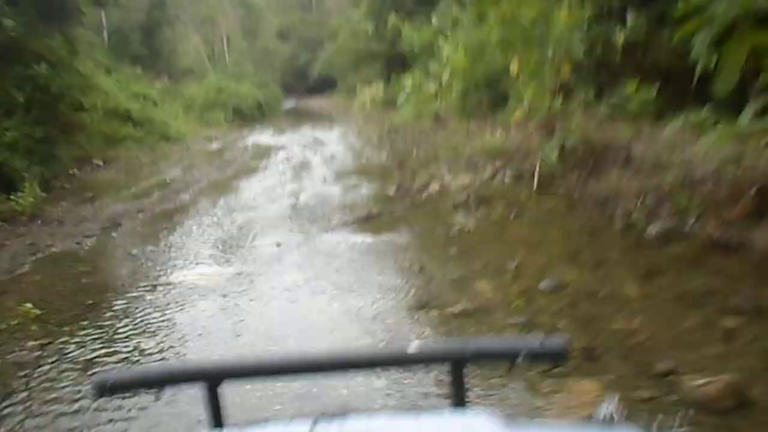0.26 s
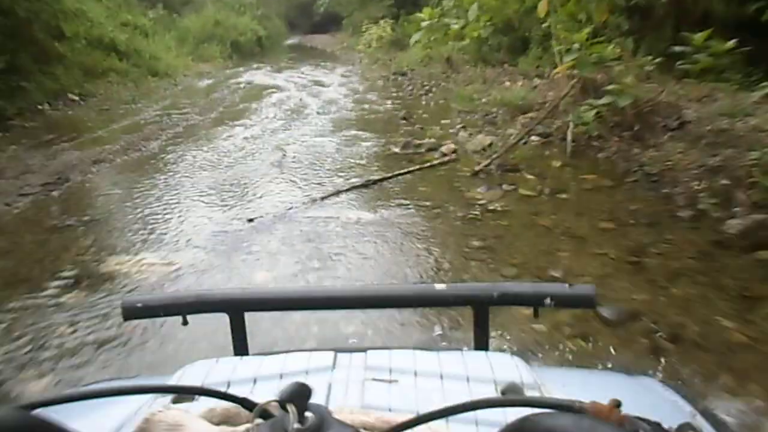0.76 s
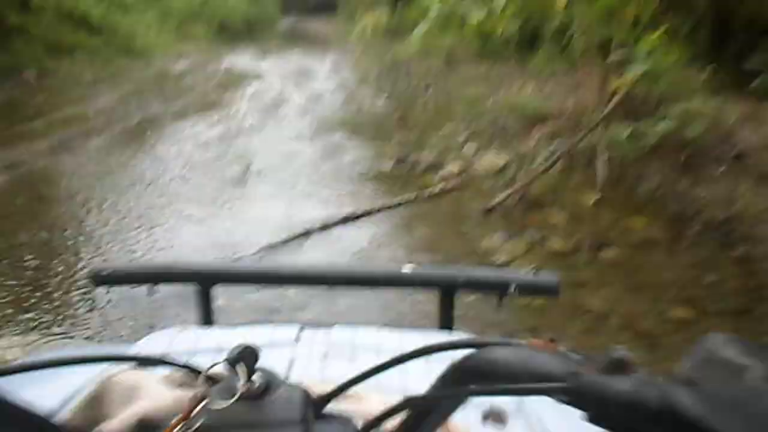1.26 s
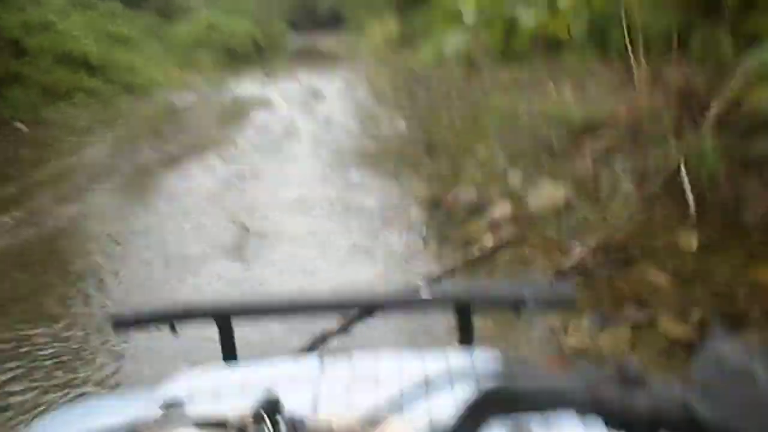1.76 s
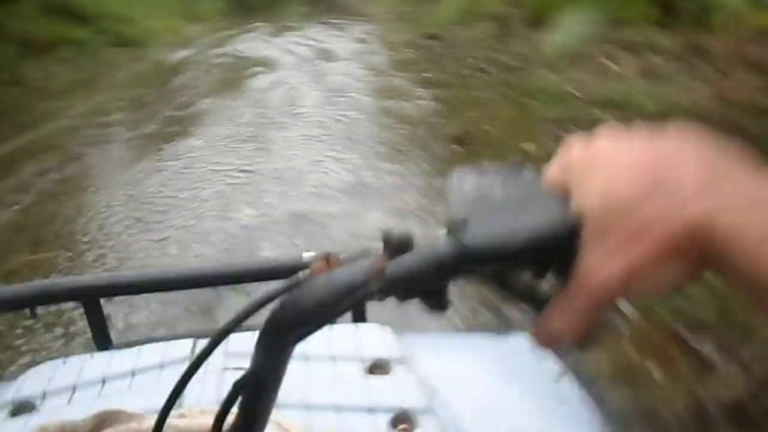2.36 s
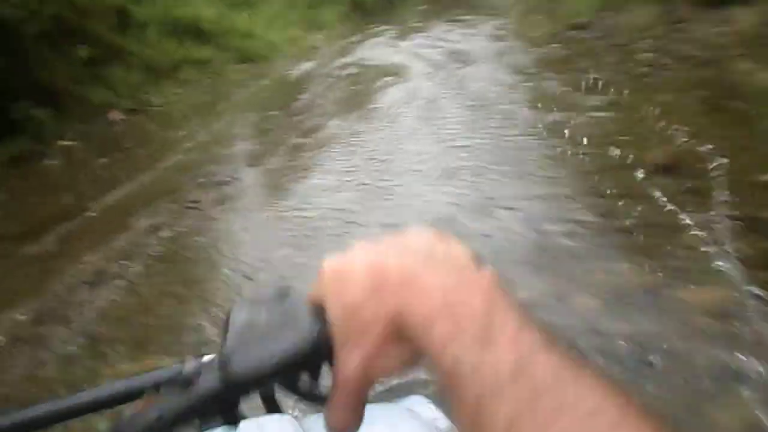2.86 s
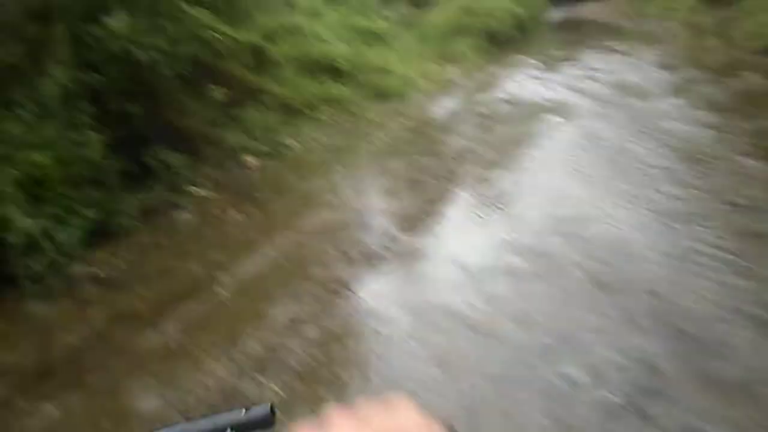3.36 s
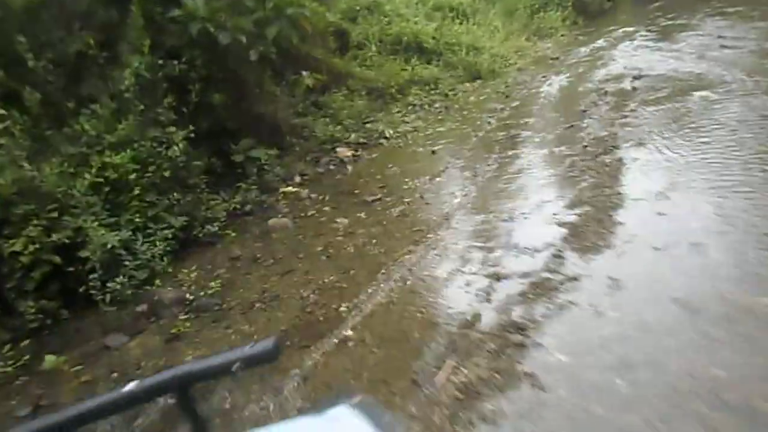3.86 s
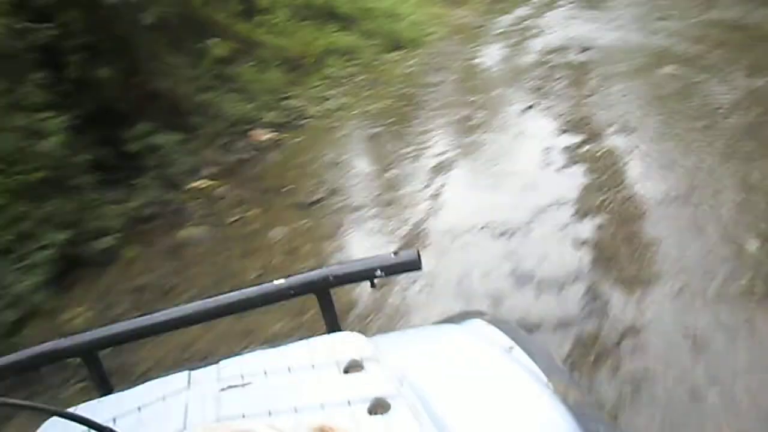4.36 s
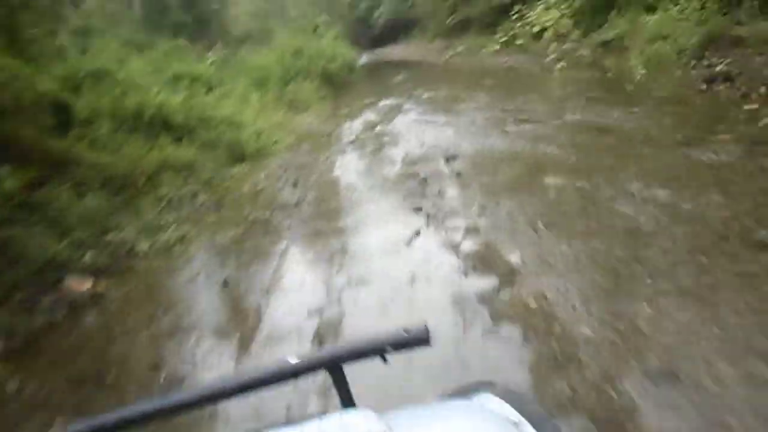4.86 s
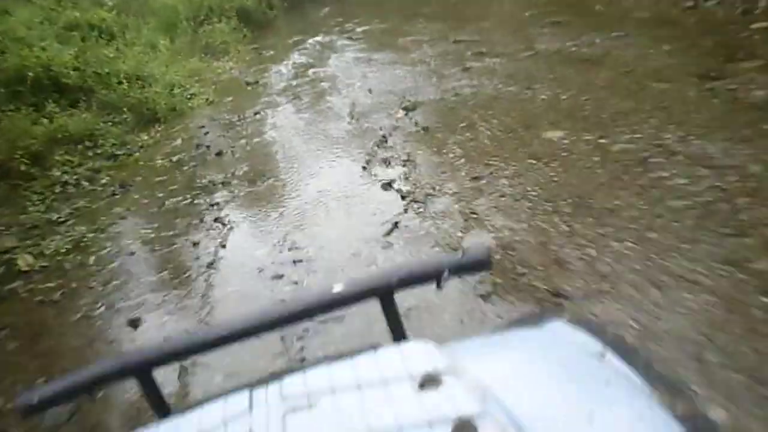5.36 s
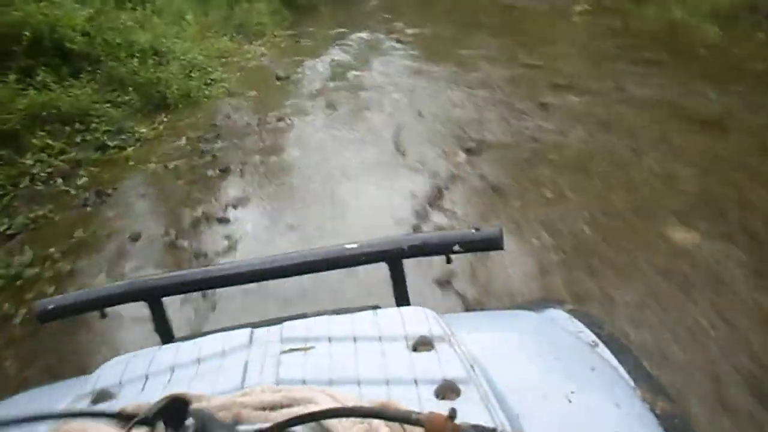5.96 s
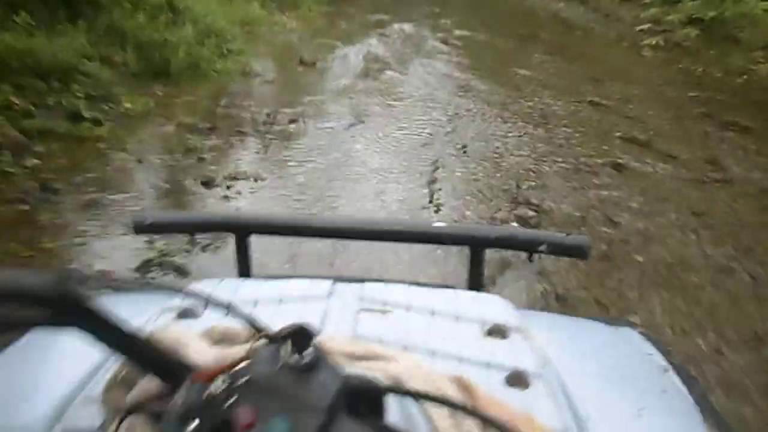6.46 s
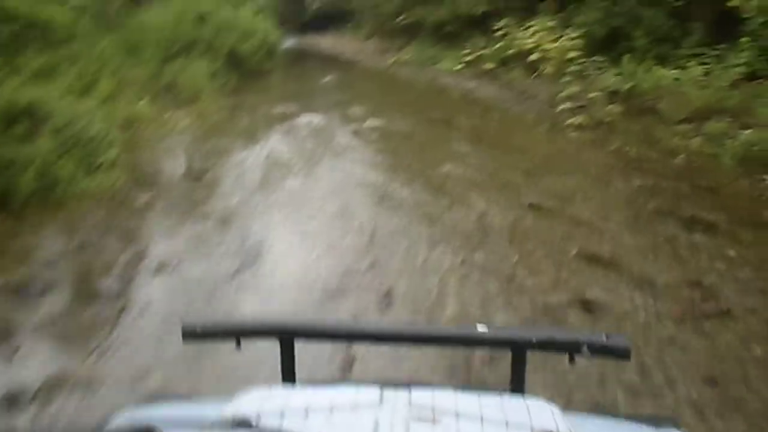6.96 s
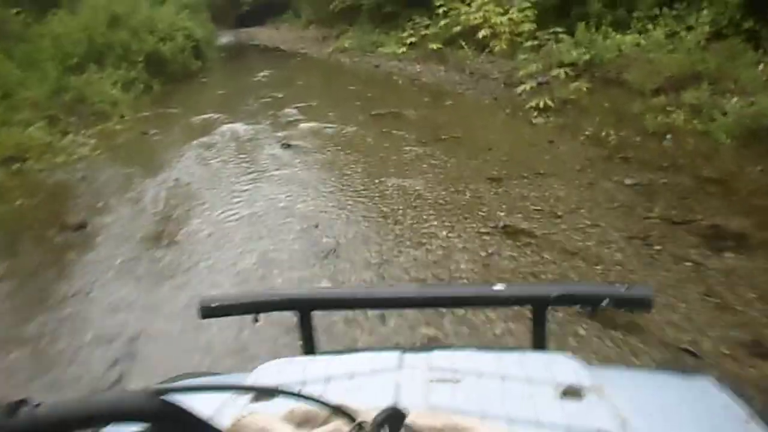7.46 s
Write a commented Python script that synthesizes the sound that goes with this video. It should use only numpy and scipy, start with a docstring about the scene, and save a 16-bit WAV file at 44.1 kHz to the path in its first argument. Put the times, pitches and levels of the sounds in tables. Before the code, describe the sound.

From the rider's seat, a small four-stroke quad engine thumps unevenly up a shallow stream, with valve clatter, tyre wash and gear clanks.

```python
"""A shallow stony stream bed: a single-cylinder four-stroke quad bike climbs slowly, heard from the rider's seat.
Each firing rings the exhaust resonances as crack, thump, bark and rasp; shaped noise makes the gas puff,
the valve clatter and the intake hiss once a cycle, and the throttle opens and closes.
Noise bursts and ringing steel make the gear change, flickering noise the tyre wash, faint wavering tones a wet brake.
Air and one bump push on the microphone of a camera close by, whose case colours the treble."""
import sys
import numpy as np
from scipy import signal
from scipy.fft import rfft, irfft, next_fast_len
from scipy.io import wavfile
from scipy.ndimage import uniform_filter1d

SR = 44100
rng = np.random.default_rng(int(sys.argv[2]) if len(sys.argv) > 2 else 0)


def wav_record(signal):
    """Record a signal, one row per channel, as 16-bit PCM in the file named by sys.argv[1]."""
    frames = np.transpose(np.atleast_2d(signal))
    bounded = np.clip(frames, -1, 1)
    # unit amplitude maps onto the largest positive 16-bit level
    quanta = np.round(bounded * 32767).astype(np.int16)
    wavfile.write(sys.argv[1], SR, quanta)


N = 340011
TIME = np.arange(N) / SR
SIZE = next_fast_len(N + SR // 2, True)  # padded length for filtering
FREQ = np.maximum(np.fft.rfftfreq(SIZE, 1 / SR), 1)
CRUISE_HZ = 23  # firings per second at which the engine levels are stated


def undb(db):
    """Decibels to gain."""
    return 10 ** (np.asarray(db) / 20)


def unit(x):
    """Scale to rms 1."""
    return x / np.sqrt(np.mean(x ** 2))


def curves(table):
    """The columns of a table of (t/s, ..) rows, drawn as straight lines at every sample."""
    s, *columns = np.transpose(table)
    return [np.interp(TIME, s, column) for column in columns]


def through(x, response):
    """Filter by a frequency response."""
    return irfft(rfft(x, SIZE) * response, SIZE)[:N]


def colour(x, points):
    """Shape a sound by (f/Hz, level/dB) points; rms 1."""
    hz, db = np.transpose(points)
    level_db = np.interp(np.log(FREQ), np.log(hz), db)
    return unit(through(x, undb(level_db)))


def noise(points):
    """Coloured noise of rms 1."""
    return colour(rng.standard_normal(N), points)


def ring(at, size, stretch, modes, rise_ms):
    """Each blow swells into the modes and dies away, at its own size and pitch; rms 1."""
    hz, width, db, side = np.transpose(modes)[:, :, None]
    age = TIME[:SR // 8]
    swell = 1 - np.exp(-age * 1000 / rise_ms)
    envelopes = np.sign(side) * undb(db) * np.exp(-np.pi * width * age)
    out = np.zeros(N + len(age))
    for start, gain, k in zip(at, size, stretch):
        waves = envelopes * np.sin(2 * np.pi * hz * k * age)
        out[start:start + len(age)] += gain * swell * waves.sum(0)
    return unit(out[:N])


def cut(x, hz, kind, order=2):
    """Low-pass or high-pass."""
    return signal.sosfilt(signal.butter(order, hz, kind, fs=SR, output="sos"), x)


def later(x, ms):
    """Delay a sound."""
    return np.interp(TIME - ms / 1000, TIME, x, left=0)


def walk(rate):
    """A random wander of spread near 1, with `rate` new values a second joined by straight lines."""
    knots = rng.standard_normal(4096)
    return np.interp(TIME * rate, np.arange(len(knots)), knots)


def engine_gain(law, firing_hz, throttle):
    """A part of the engine grows louder with the throttle and changes with speed."""
    full_db, shut_db, octave_db = law
    return undb(full_db - shut_db * (1 - throttle) + octave_db * np.log2(firing_hz / CRUISE_HZ))


def firings(cycles, slack, scatter_db, jitter_ms):
    """Sample and size of each firing; on a closed throttle the burn is uneven in strength and timing."""
    at = np.searchsorted(cycles, np.arange(1, int(cycles[-1]) + 1))
    strength, late = rng.standard_normal((len(at), 2)).T
    delay = late * slack[at] * jitter_ms * SR / 1000
    size = undb(scatter_db * strength * (0.5 + 1.7 * slack[at]))
    return np.clip(at + delay.astype(int), 0, N - 1), size


# exhaust resonances, silencer box up to pipe overtones, and the sharp first crack:
# f/Hz, width/Hz, relative level/dB, polarity
BOOM_MODES = [(47.5, 29, 0, 1)]
THUMP_MODES = [(119.6, 54.4, 0, -1)]
CRACK_MODES = [(383.7, 144, 0, -1)]
BARK_MODES = [(285.9, 15.8, 0, -1), (315.4, 24.6, 9, -1), (410, 17.6, -13, 1), (433, 28, -3.5, -1)]
RASP_MODES = [(523, 47.5, 6, -1), (639.4, 30, 5, 1), (801, 26, -1, -1), (897.5, 45, -4.5, 1)]
# turbulent gas: f/Hz, relative level/dB
GAS_COLOUR = [(50, -14.5), (85, 2), (130, -0.5), (200, -3), (300, -2), (430, -6.5), (550, -12.5),
              (800, -20), (1300, -24), (2200, -26.5), (5000, -61.5)]
# how each part follows the engine: level/dB at full throttle and cruising speed,
# loss/dB with the throttle shut, slope/dB per octave of speed
BOOM_LAW = (-19.5, 10.5, 4.5)
THUMP_LAW = (-17, 15, -15.5)
CRACK_LAW = (-27, 25, -6.5)
BARK_LAW = (-27, 15, 3.5)
PUFF_LAW = (-37, 1.5, 4)
RASP_LAW = (-51, 0.5, -5.5)
# bark and rasp over their usual strength: t/s, level/dB
BARK_LIFT_CURVE = [(.6, -0.5), (1.2, -2.5), (2.1, -5), (2.4, 1), (3.7, -1), (4.7, 1.5), (5.2, 0.5),
                   (7.7, 3)]
RASP_LIFT_CURVE = [(.62, 4.5), (.8, -7), (2.5, -4), (4.6, -3), (5.9, -1), (6.7, 2.5), (7.7, 6.5)]
STEADY_THROTTLE, SLACK_THUMP_DB = .45, -13.5  # below this opening the burn turns slack and the thump weakens
# the pulse returns from the pipe's end, most clearly on a light throttle
ECHO_MS, ECHO_OPEN_DB, ECHO_SHUT_DB = 8.14, -16.5, 5


def exhaust(cycles, firing_hz, throttle, boom_lag_ms=2.79, thump_lag_ms=0.58, bark_lag_ms=0.82, rasp_lag_ms=2.52):
    """Each firing cracks out of the valve, thumps the silencer and rings the pipe; a puff of gas follows."""
    slack = np.clip(1 - throttle / STEADY_THROTTLE, 0, 1)
    at, size = firings(cycles, slack, scatter_db=1.046, jitter_ms=1.2)
    # hotter, faster gas at high revs lifts the resonances, and no two burns are equally hot
    revs = firing_hz[at] / CRUISE_HZ
    heat = 1 + .004 * rng.standard_normal(len(at))

    boom = later(ring(at, size, heat * revs ** 0.96, BOOM_MODES, rise_ms=2.2), boom_lag_ms)

    # the gas takes some milliseconds to leave the cylinder, which rounds the thump
    thump = later(ring(at, size, heat * revs ** 0.68, THUMP_MODES, rise_ms=6), thump_lag_ms)
    echo_db = ECHO_SHUT_DB + (ECHO_OPEN_DB - ECHO_SHUT_DB) * throttle
    echo = later(thump, ECHO_MS) * undb(echo_db)
    thump = unit(thump + echo) * undb(SLACK_THUMP_DB * slack)

    crack = unit(cut(ring(at, size, heat, CRACK_MODES, rise_ms=1.56), 617, "low"))

    bark = later(ring(at, size, heat * revs ** 0.51, BARK_MODES, rise_ms=0.69), bark_lag_ms)
    bark = unit(cut(bark, 500, "low")) * undb(curves(BARK_LIFT_CURVE)[0])

    rasp = later(ring(at, size, heat * revs ** 0.17, RASP_MODES, rise_ms=3.2), rasp_lag_ms)
    rasp = rasp * undb(curves(RASP_LIFT_CURVE)[0])

    flow = np.exp(-((cycles - .06) % 1) / 0.99)
    flow = uniform_filter1d(flow, size=300)  # the valve opens gradually
    puff = unit(noise(GAS_COLOUR) * flow)

    parts = [(boom, BOOM_LAW), (thump, THUMP_LAW), (crack, CRACK_LAW),
             (bark, BARK_LAW), (puff, PUFF_LAW), (rasp, RASP_LAW)]
    return sum(part * engine_gain(law, firing_hz, throttle) for part, law in parts)


# knocks in each cycle: place in the cycle/0-1, decay/cycles, relative level/dB
VALVE_KNOCKS = [(0.264, 0.03, -6), (0.595, 0.16, 8), (0.94, 0.17, 3.5)]
# valve cover and crankcase: f/Hz, relative level/dB
CLATTER_COLOUR = [(500, -27.5), (1300, -38), (2200, 4), (3500, 6), (6000, -1), (7500, 1), (10000, -11.5)]
# clatter over its usual strength: t/s, level/dB
CLATTER_LIFT_CURVE = [(0, 0), (1, 2.5), (2.5, 0), (3.9, -0.5), (4.8, 0.5), (5.05, -2), (5.7, 2.5), (6.7, 1),
                      (7.7, 1.5)]
# level/dB at full throttle and cruising speed, loss/dB with the throttle shut, slope/dB per octave of speed
CLATTER_LAW = (-49.5, 8, 3.5)


def valve_train(cycles, firing_hz, throttle):
    """Rockers and valves knock at fixed places in the cycle, never twice alike, over the whirr of the cam chain."""
    force = 0.33  # the steady whirr
    for place, decay, db in VALVE_KNOCKS:
        since = cycles + 1 - place
        strength = undb(db + 1.4 * rng.standard_normal(512))[since.astype(int)]
        force = force + strength * np.exp(-(since % 1) / decay)
    rattle = rng.standard_normal(N) * uniform_filter1d(force, size=70) * undb(0.53 * walk(450))
    clatter = colour(rattle, CLATTER_COLOUR) * undb(curves(CLATTER_LIFT_CURVE)[0])
    return clatter * engine_gain(CLATTER_LAW, firing_hz, throttle)


# air intake: f/Hz, relative level/dB
INTAKE_COLOUR = [(1500, -20), (3500, 1), (6000, -7), (7500, -0.5), (9000, -2.5), (10300, -11)]
# level/dB at full throttle and cruising speed, loss/dB with the throttle shut, slope/dB per octave of speed
INTAKE_LAW = (-49.5, 15, 4.5)


def intake(cycles, firing_hz, throttle, place=0.44, length=0.15):
    """Air hisses past the throttle while the piston draws in; place and length are in cycles."""
    draw = 0.2 + np.exp(-((cycles % 1 - place) / length) ** 2)
    hiss = unit(noise(INTAKE_COLOUR) * draw * undb(2.7 * walk(30)))
    return hiss * engine_gain(INTAKE_LAW, firing_hz, throttle)


# tyres in water: f/Hz, relative level/dB
WASH_COLOUR = [(100, -14), (300, -3), (600, 0), (950, -2), (1200, 1), (1600, -5), (2500, -12), (9000, -25)]
# tyres in the stream: t/s, level/dB
WATER_LEVEL = [(0, -48.5), (1, -51), (1.3, -49), (2.1, -50), (4.6, -47), (5.4, -52), (7.7, -51)]


def tyres():
    """Water churns round the tyres, with small spatters in it."""
    spatter = rng.standard_normal(N) * undb(3.7 * walk(300))
    return colour(spatter, WASH_COLOUR) * undb(curves(WATER_LEVEL)[0] + 0.16 * walk(4.2))


# gusts and lurches that push air on the camera, added to the breeze: t/s, half length/s, level/dB
AIR_GUSTS = [(0.156, 0.63, -27.5), (1.397, 0.46, -30), (2.365, 0.17, -16), (3.297, 1, -31)]
BREEZE_DB = -39.5


def buffeting(eddy_db=-8.5):
    """Air and jolts of the track push slowly on the microphone."""
    strength = undb(BREEZE_DB)
    strength = strength + sum(undb(db) * np.exp(-((TIME - s) / half) ** 2) for s, half, db in AIR_GUSTS)
    push = noise([(4, -18), (12, 0), (20, -2), (30, -9), (50, -20), (90, -32), (200, -48), (600, -80)])
    # only the strongest gusts break up into a higher rumble
    eddies = noise([(25, -9.5), (60, 3), (110, -7.5), (200, -23.5), (600, -71.5)]) * undb(eddy_db)
    return push * strength + eddies * strength ** 2


# clanks of the gear change and drive: t/s, relative level/dB, lead of the first touch/ms
GEAR_CLANKS = [(.368, -23.5, 5), (.426, -28, 27), (1.524, -22, 6), (2.227, -21, 5.5), (2.276, -28, 6.3),
               (2.334, -26, 11), (2.368, -29, 4), (2.535, -33.5, 3)]
# gearbox: f/Hz, relative level/dB
GEARBOX_COLOUR = [(150, -22), (500, 8.5), (800, 11.5), (1400, -3), (2300, 0.5), (3700, 1.5), (4500, -1),
                  (5400, -11), (6300, -8), (7200, -7.5), (10000, -30)]
# ringing steel of the gear change: f/Hz, width/Hz, relative level/dB, polarity
STEEL_MODES = [(812, 49, -8, 1), (2150, 120, 8, -1), (2810, 44, 1, 1), (3040, 30, -1.5, -1),
               (3636, 69, 0.5, 1), (6260, 146, 6, -1)]
TOUCH_DB, CHATTER_MS = -4.5, 8.2  # the first touch is lighter than the blow that seats the part; both die away


def gear_change(chatter_db=-8, steel_db=-55.5):
    """Steel parts touch, slap home, ring briefly and chatter to rest in the gearbox."""
    force = np.zeros(N)
    age_ms = TIME[:SR // 8] * 1000
    s, db, lead_ms = np.transpose(GEAR_CLANKS)
    at = (np.r_[s - lead_ms / 1000, s] * SR).astype(int)  # all touches, then all blows
    sizes = undb(np.r_[db + TOUCH_DB, db])
    for start, size in zip(at, sizes):
        force[start:start + len(age_ms)] += size * np.exp(-age_ms / CHATTER_MS)
    chatter = noise(GEARBOX_COLOUR) * force
    pitch = 1 + 0.0033 * rng.standard_normal(len(at))
    steel = ring(at, sizes, pitch, STEEL_MODES, rise_ms=0.24)
    return chatter * undb(chatter_db) + steel * undb(steel_db)


# faint squeals of a wet brake: start t/s, end t/s, f/Hz, peak level/dB
BRAKE_SQUEALS = [(1.7, 1.98, 3080, -50), (1.944, 2.34, 6020, -68)]


def brake():
    """A wet pad sings faintly, swelling and fading, with a wavering pitch."""
    out = np.zeros(N)
    for start, end, hz, db in BRAKE_SQUEALS:
        press = np.sin(np.pi * np.clip((TIME - start) / (end - start), 0, 1))
        phase = 2 * np.pi * np.cumsum(hz * (1 + 0.0042 * walk(60))) / SR
        out += undb(db) * press * np.sin(phase)
    return out


def jolt(s=2.232, db=-27.5):
    """A bump shakes the camera with a dull thud and leaves it swaying for a moment."""
    modes = [(12, 9, 0, -1), (45, 60, -6, -1)]  # f/Hz, width/Hz, relative level/dB, polarity
    return ring([int(s * SR)], [1], [1], modes, rise_ms=2.5) * undb(db)


# engine speed: t/s, firing rate f/Hz
FIRING_RATE = [(0.0, 26.63), (0.6, 25.43), (1.04, 20.57), (1.26, 22.0), (1.66, 20.01), (2.0, 21.09),
               (2.22, 20.4), (2.6, 26.43), (2.82, 21.39), (3.1, 25.66), (3.18, 23.88), (3.48, 27.99),
               (3.6, 25.26), (3.98, 22.64), (4.5, 25.05), (4.72, 27.86), (4.92, 23.59), (5.72, 20.26),
               (6.12, 21.77), (6.32, 20.36), (6.7, 23.04), (7.1, 22.41), (7.44, 24.74), (7.7, 23.48)]
# the rider's thumb: t/s, throttle opening/0-1
THUMB = [(0.0, 0.57), (0.55, 0.64), (0.86, 0.16), (1.06, 0.19), (1.3, 0.59), (1.63, 0.23), (1.74, 0.6),
         (2.09, 0.31), (2.35, 0.66), (2.59, 0.82), (2.66, 0.3), (2.95, 0.61), (3.43, 0.69), (3.83, 0.58),
         (4.18, 0.83), (4.75, 0.9), (4.88, 0.63), (4.93, 0.24), (5.94, 0.41), (6.07, 0.73), (6.29, 0.24),
         (6.47, 0.72), (6.95, 0.51), (7.7, 0.49)]


def scene():
    """One cycle count drives every part of the engine; throttle and speed set how loud each is."""
    firing_hz = curves(FIRING_RATE)[0]
    throttle = np.clip(curves(THUMB)[0], 0, 1)
    cycles = .525 + np.cumsum(firing_hz) / SR  # one firing at each whole number
    engine = (exhaust(cycles, firing_hz, throttle)
              + valve_train(cycles, firing_hz, throttle)
              + intake(cycles, firing_hz, throttle))
    return (engine + tyres() + buffeting() + gear_change() + brake() + jolt())[None]


# resonances and notches of the camera case: f/Hz, half width/Hz, level/dB
CASE_RESPONSE = [(1853, 380, -7), (2385, 122, 6.5), (2675, 164, 7), (3120, 76, -8), (3421, 96, 8),
                 (3664, 220, 4), (4340, 150, -1.5), (4985, 70, 6.5), (5300, 68, 0), (5610, 210, 8.5),
                 (5990, 110, 13), (6470, 280, 5.5), (7570, 110, 4.5)]
TOP_HZ = 10400


def record(dry):
    """The camera case colours the treble at its microphone; the deepest bass and the top are cut."""
    case_db = sum(db * np.exp(-((FREQ - hz) / width) ** 2) for hz, width, db in CASE_RESPONSE)
    heard = cut(through(dry[0], undb(case_db)), 3.3, "high", order=1)
    return cut(heard, TOP_HZ, "low", order=20)[None]


dry = scene()
out = record(dry)
wav_record(out)
```